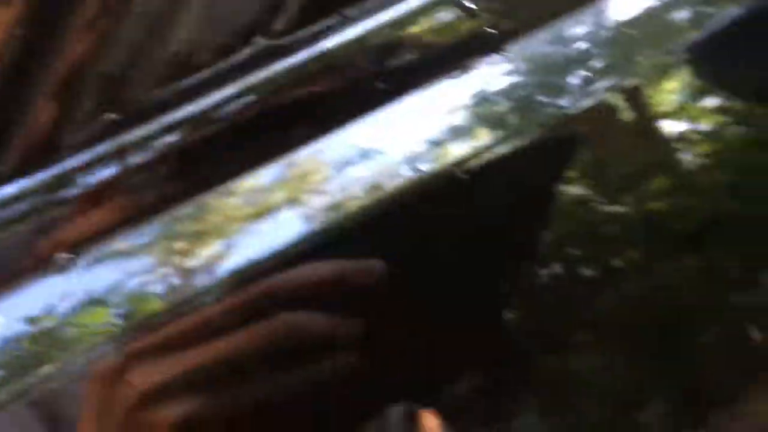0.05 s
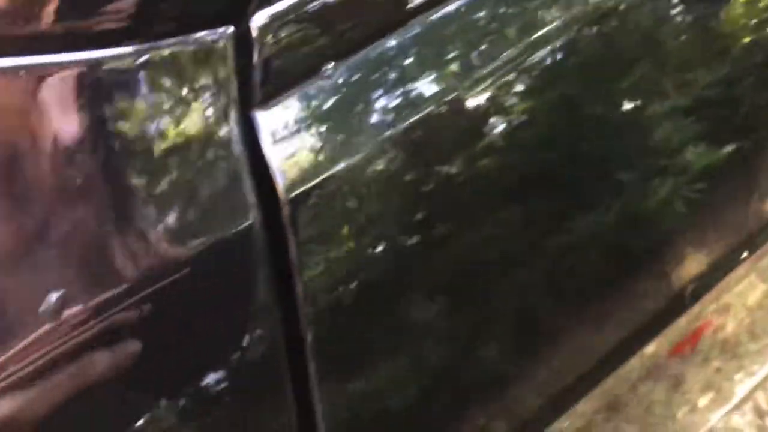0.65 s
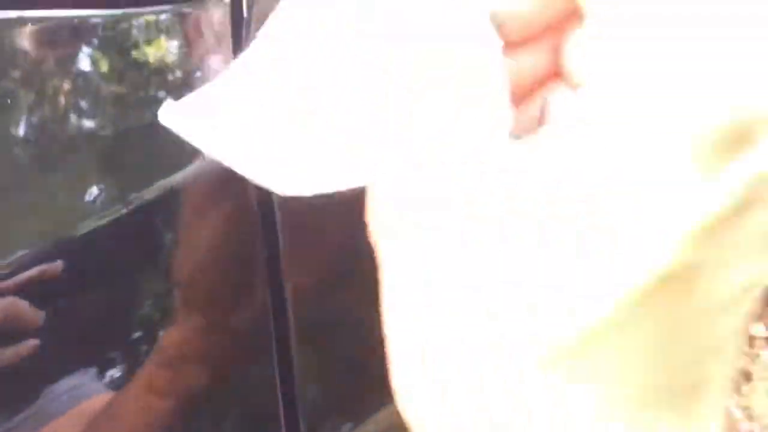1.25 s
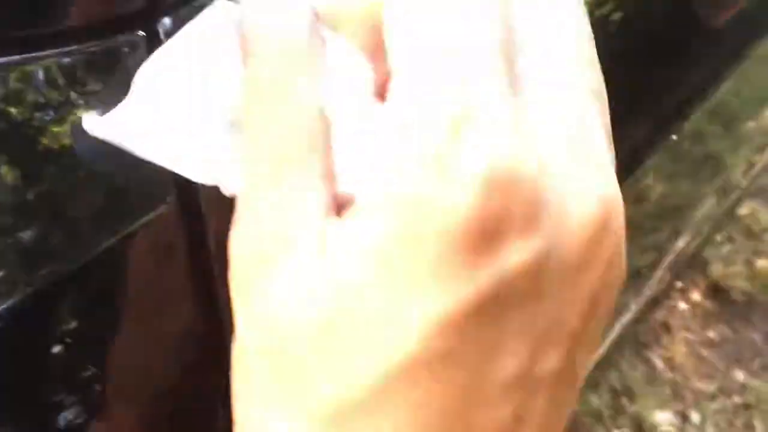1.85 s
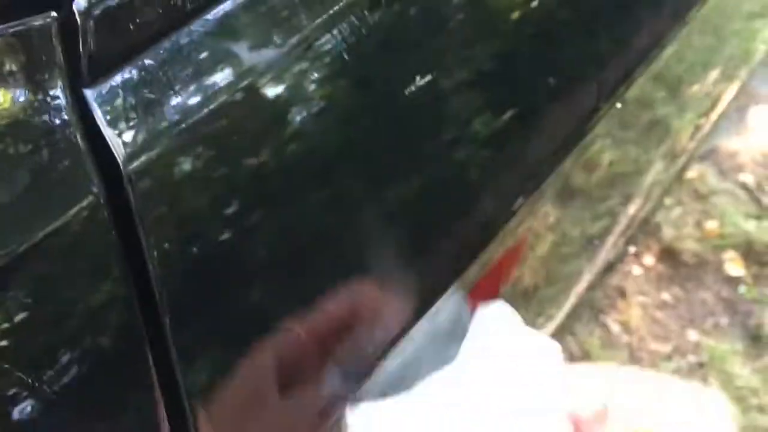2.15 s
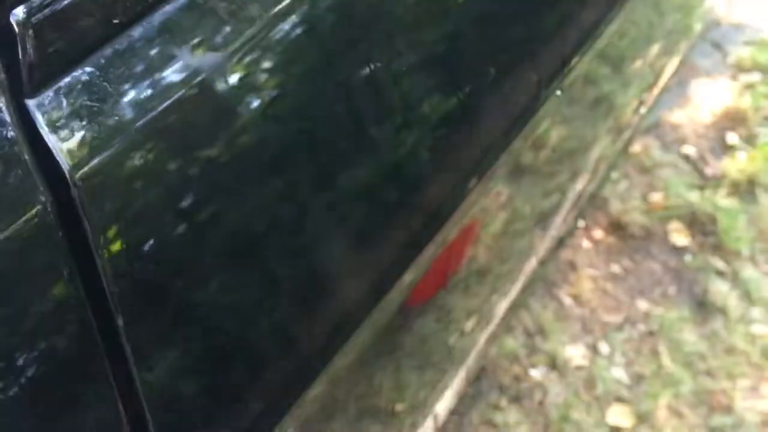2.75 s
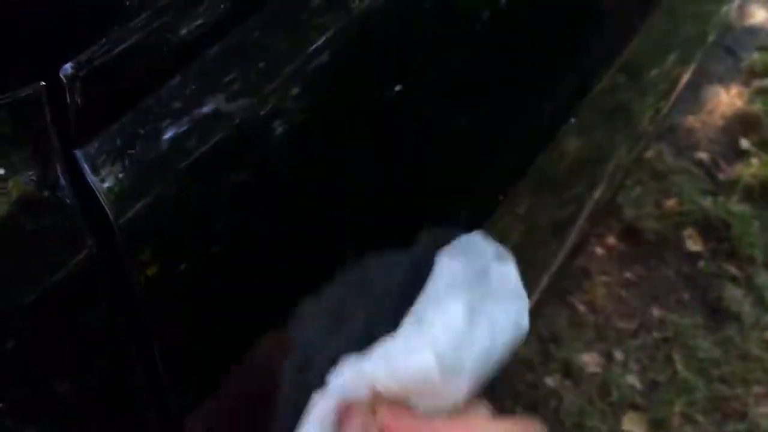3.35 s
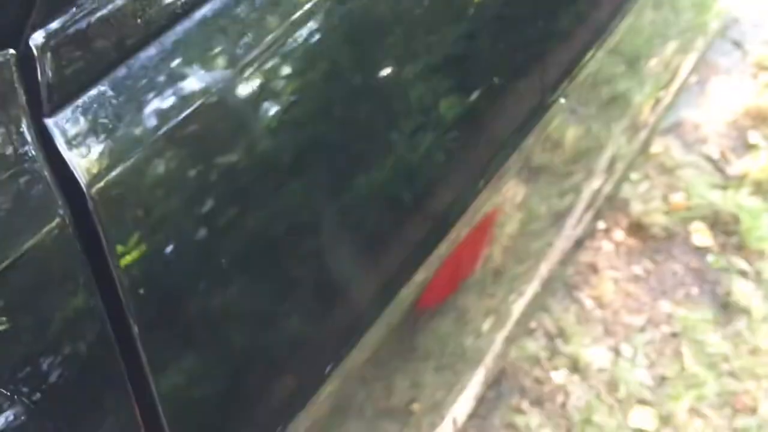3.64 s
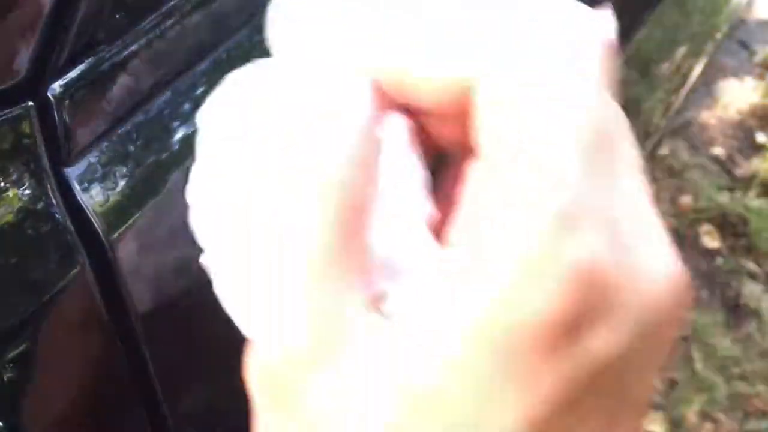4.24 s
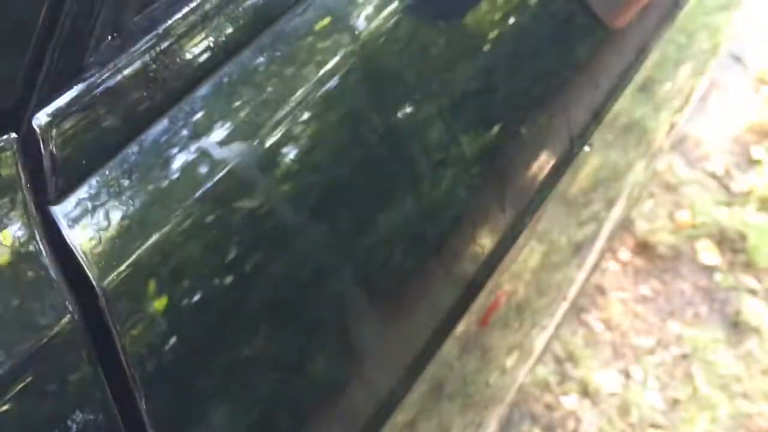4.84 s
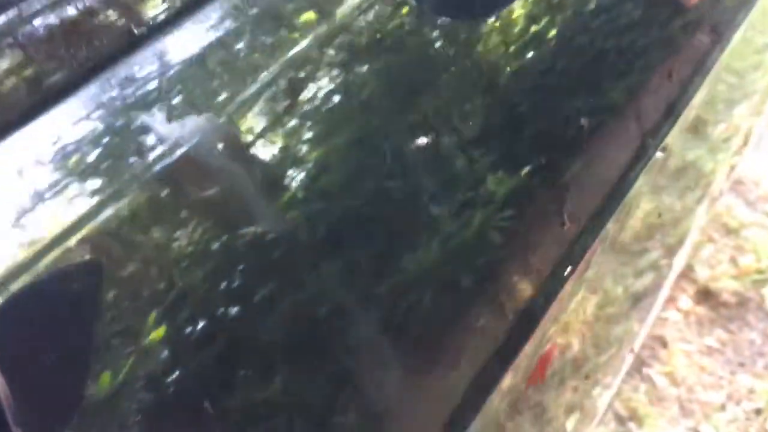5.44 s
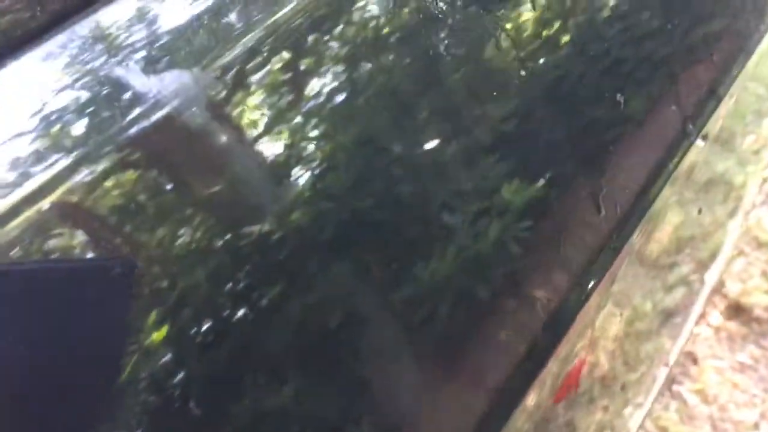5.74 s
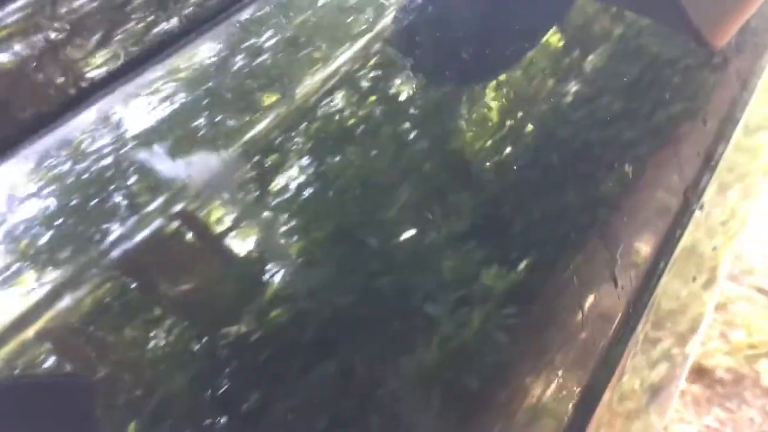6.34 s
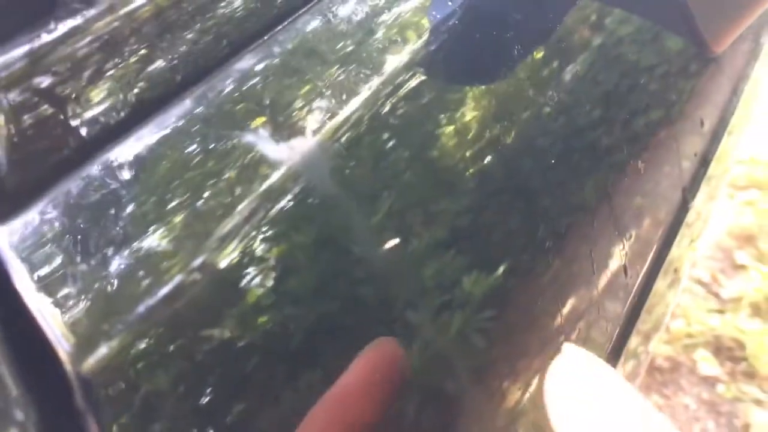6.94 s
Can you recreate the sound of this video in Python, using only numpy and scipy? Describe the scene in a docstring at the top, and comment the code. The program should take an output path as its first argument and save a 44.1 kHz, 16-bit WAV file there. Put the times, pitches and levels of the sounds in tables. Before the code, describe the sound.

A damp tissue wipes a car door in wet, crackling swishes, with a few soft knocks and a squeak over a low outdoor rumble.

```python
"""Wiping a car door

A damp wad is wiped over a car door outdoors, close to a mono microphone. The wet film
hisses, crackles and snaps. Now and then the wad grips the paint and squeaks, or lands
with a soft knock that drums the door's metal skin. A low rumble lies underneath."""
import sys
import numpy as np
from scipy import signal
from scipy.fft import rfft, irfft, next_fast_len
from scipy.io import wavfile
from scipy.ndimage import uniform_filter1d

SR = 44100
rng = np.random.default_rng(int(sys.argv[2]) if len(sys.argv) > 2 else 0)


def log_audio(samples):
    """Write samples as a 16-bit WAV file to the path given in sys.argv[1]."""
    # one column per channel
    frames = np.atleast_2d(samples).T
    # limit to full scale, then quantise
    limited = np.clip(frames, -1, 1)
    pcm = np.round(limited * 32767).astype(np.int16)
    wavfile.write(sys.argv[1], SR, pcm)


N = 308259
T = np.arange(N) / SR


def wiping():
    """The sliding wad makes gritty friction, fizz from the wet film and a duller drag."""
    # light contact between strokes: time_s, level_db, fizz_offset_db
    contact = [(0, -60, -10), (.4, -60.5, -7.5), (.8, -62, -13), (1.1, -56.5, -5), (1.7, -59.5, 0.5),
               (2.15, -57, -8), (2.5, -54, -10), (3.0, -51, -2), (3.7, -64, -26), (4.02, -66, -11),
               (4.4, -53.5, -6.5), (4.85, -60.5, -13), (5.15, -59.5, -13), (5.42, -70, -3.5),
               (5.85, -68.5, -11), (6.99, -73, -7)]
    # strokes over the paint: fastest_at_s, rise_s, fade_s, level_db, fizz_offset_db
    strokes = [(.135, 0.06, 0.074, -57, -22), (.29, 0.046, 0.079, -55.5, -11),
               (.64, 0.034, 0.031, -57.5, -13), (.87, .012, .03, -55, -12), (.97, 0.072, 0.057, -48.5, -17),
               (1.19, 0.024, 0.021, -53.5, -7), (1.3, 0.026, 0.035, -51.5, -14),
               (1.415, 0.058, 0.045, -46.5, -4.5), (1.51, 0.033, 0.044, -64.5, 12.5),
               (1.575, .028, 0.038, -48, -13), (1.945, 0.13, 0.066, -48.5, -6.5),
               (2.06, 0.032, 0.039, -52, 0.5), (2.22, 0.04, 0.029, -51.5, -0.5),
               (2.36, 0.12, 0.057, -56, 2.5), (2.45, 0.022, 0.051, -48, -7), (2.512, 0.015, .06, -46.5, -7),
               (2.62, 0.11, 0.071, -59, 10.5), (2.705, 0.012, 0.062, -48, -9),
               (2.84, 0.069, 0.066, -47.5, -4), (3.055, 0.043, 0.18, -41.5, -9),
               (3.205, 0.028, .1, -36.5, -13), (3.35, 0.11, 0.21, -39.5, -9.5),
               (3.58, 0.063, 0.069, -50, -29), (3.77, 0.031, 0.11, -58, -11), (4.12, 0.047, .04, -62, -1.5),
               (4.21, 0.05, 0.038, -50, -6), (4.335, 0.064, .035, -55.5, 1), (4.43, 0.028, .04, -54.5, 2),
               (4.52, 0.086, 0.14, -42, -10), (4.62, 0.089, 0.12, -43, -23), (5.01, 0.12, .16, -55, -9.5),
               (5.3, 0.22, 0.052, -64.5, 1), (5.59, 0.24, 0.06, -63.5, -14), (5.75, .025, 0.16, -65.5, -11),
               (6.05, .015, .025, -62.5, -5), (6.15, 0.041, 0.045, -69.5, -14),
               (6.36, 0.11, 0.098, -67, -8), (6.72, 0.096, 0.046, -68, -3)]
    # the tone of the friction, the fizz and the drag: pitch_hz, gain_db
    friction_tone = [(500, -40), (1200, -14), (1750, 0), (2700, -3.5), (3600, -2.5), (4600, -4.5),
                     (6200, -4.5), (7400, -13.5), (9000, -26), (14000, -48)]
    fizz_tone = [(4000, -5.5), (7000, -1), (8800, 0), (11700, -4.5), (13300, -7), (16000, -8)]
    drag_tone = [(200, -5.5), (400, -5.5), (600, -6), (1050, 0), (1400, -2), (2200, -18.5), (5000, -36)]
    touch_db, wet_db = curves(contact)
    rubbing = undb(touch_db) ** 2 + swells(row[:4] for row in strokes)
    wet_strokes = swells((s, rise, fade, db + wet) for s, rise, fade, db, wet in strokes)
    wetness = undb(touch_db + wet_db) ** 2 + wet_strokes
    level_db = 10 * np.log10(rubbing)
    # a light touch catches unevenly, a firm stroke slides smoothly
    uneven_db = np.interp(level_db, [-53, -42], [2.4, 1.1])
    grip = undb(0.65 * uneven_db * wander(45))
    friction = colour(crackle(per_s=3500, spread_db=3.5, share=0.41), friction_tone) * np.sqrt(rubbing)
    foam = colour(crackle(per_s=1100, spread_db=3.5, share=0.25), fizz_tone)
    lone_bubbles = colour(crackle(per_s=45, spread_db=0.5, share=1), fizz_tone)
    fizz = (foam + undb(-12.5) * lone_bubbles) * np.sqrt(wetness)
    # the drag grows more slowly than the friction, and dies away as the wad lifts off
    light_touch_db = -56.5
    drag_db = -61.5 + 0.26 * (level_db - light_touch_db)
    touching = np.sqrt(rubbing / (rubbing + undb(-59) ** 2))
    drag = colour(crackle(per_s=600, spread_db=2, share=0.45), drag_tone) * undb(drag_db) * touching
    rub = grip * (undb(-1.84) * friction + undb(0.3) * fizz + drag)
    return folds(rub, uneven_db, per_s=40)


def folds(x, depth_db, per_s):
    """Folds of the wad open and close small pockets, so narrow bands of pitch swell and sink."""
    size = next_fast_len(N)
    spectrum = rfft(x, size)
    pitch = np.log(np.fft.rfftfreq(size, 1 / SR) + 1500)
    centres = np.linspace(pitch[0], pitch[-1], 24)
    shares = (np.maximum(1 - np.abs(pitch - c) / (centres[1] - centres[0]), 0) for c in centres)
    bands = (irfft(spectrum * share, size)[:N] * undb(depth_db * wander(per_s)) for share in shares)
    return sum(bands) * undb(-depth_db ** 2 * np.log(10) / 20)  # keep about the same loudness


def brushes():
    """Wet crackle swells briefly as a fold is dragged, foam sizzles or the wad is squashed."""
    # quick wet brushes: peak_s, rise_s, fade_s, level_db, pitch_hz, width_hz
    quick_brushes = [(.085, .0086, .02, -50.5, 3500, 5000), (.289, .0093, 0.024, -50.5, 4670, 1990),
                     (.974, .05, 0.014, -50.5, 2750, 4000), (1.571, .012, .018, -37, 3850, 9900),
                     (1.578, .0098, 0.089, -53, 500, 1000), (1.715, .012, 0.019, -52.5, 1950, 3000),
                     (1.855, .019, .028, -49.5, 7450, 9000), (1.917, 0.015, 0.013, -43.5, 1600, 2500),
                     (2.512, 0.0099, 0.015, -47, 1000, 800), (1.962, .012, 0.023, -49.5, 840, 500),
                     (2.078, .013, 0.013, -46.5, 5000, 10000), (2.09, .015, 0.0072, -47, 445, 500),
                     (2.6, .06, .04, -48.5, 6160, 1500), (2.652, .012, 0.01, -43, 4540, 9000),
                     (3.014, .013, 0.057, -45, 5500, 1600), (3.24, .05, 0.18, -45, 3820, 900),
                     (3.322, .021, 0.021, -49, 494, 250), (3.95, .013, 0.0099, -61.5, 2730, 690),
                     (5.225, 0.041, 0.049, -58, 3430, 1380), (5.305, 0.056, 0.055, -59, 2410, 900),
                     (5.571, .093, .06, -69, 1790, 450), (6.05, .0091, 0.039, -65, 1780, 500),
                     (6.71, .043, 0.064, -61.5, 4600, 2200)]
    # thin, very high sizzles of foam: peak_s, length_s, level_db
    sizzles = [(0.342, 0.13, -60.5), (1.188, 0.0053, -51), (3.78, 0.12, -63.5), (4.928, .08, -72),
               (5.227, 0.08, -64), (5.98, .025, -70)]
    # the wad pressed flat: peak_s, rise_s, fade_s, level_db, hollow_offset_db
    squashes = [(3.052, .005, 0.074, -34.5, -3.5), (4.66, .025, 0.078, -43.5, -2)]
    sizzle, spit, hollow = (14300, 3600), (1870, 1140), (830, 420)  # each: pitch_hz, width_hz
    bursts = list(quick_brushes)
    bursts += [(s, length / 2, length / 2, db, *sizzle) for s, length, db in sizzles]
    # a squash spits out water and rings the hollow under the palm
    for s, rise, fade, db, hollow_db in squashes:
        bursts += [(s, rise, fade, db, *spit), (s, rise, fade, db + hollow_db, *hollow)]
    out = np.zeros(N)
    grit = crackle(per_s=1300, spread_db=4.0, share=0.52)
    for s, rise, fade, db, hz, width in bursts:
        t = np.arange(-2 * rise, 6 * fade, 1 / SR)
        swell = np.exp(np.where(t < 0, -2 * (t / rise) ** 2, -t / fade))
        grains = np.roll(grit, rng.integers(N))[:len(t)]
        squelch = unit(steep_band(grains, hz, 1.32 * width))  # widened, as filtering twice narrows it
        add(out, s - 2 * rise, undb(db) * swell * squelch)
    return out


def snaps(tick_s=0.00064, spatter_s=0.0046, spatter_db=-16):
    """A film of water parts with a tick and a tiny spatter."""
    # small wet snaps: start_s, level_db, pitch_hz, width_hz
    wet_snaps = [(.083, -49, 1300, 900), (0.322, -50, 1180, 800), (0.474, -51, 5400, 2500),
                 (0.858, -50, 3950, 7960), (0.9873, -36.5, 3400, 4470), (1.676, -44, 3060, 4500),
                 (1.727, -45, 2670, 2200), (1.803, -48.5, 2200, 3000), (1.920, -40, 2480, 5000),
                 (2.030, -47, 900, 2000), (2.653, -42, 2500, 5000), (2.963, -45, 2800, 2500),
                 (5.347, -53, 2350, 1500), (5.565, -56, 1850, 700), (5.910, -56, 4570, 2400),
                 (5.967, -59, 3800, 3000), (6.045, -62, 4500, 6000), (6.547, -63, 3200, 1500),
                 (6.7533, -54.5, 1070, 900), (6.831, -58, 2320, 2000)]
    out, t = np.zeros(N), np.arange(SR // 20) / SR
    fade = np.exp(-t / tick_s) + undb(spatter_db) * np.exp(-t / spatter_s)
    for s, db, hz, width in wet_snaps:
        tick = steep_band(rng.choice([-1, 1], len(t)) * fade, hz, width)
        add(out, s, undb(db) * tick / tick[:SR // 500].std())  # the first 2 ms set the level
    return out


def squeaks():
    """The wad grips the paint: one rising squeak, and several short chirps."""
    # the rising squeak: time_s, pitch_hz, level_db, roughness (0 is smooth)
    squeak = [(4.446, 934, -53, 0.7), (4.452, 937, -34, 1.2), (4.462, 998, -34.5, 0.6),
              (4.469, 1068, -25.5, 0.4), (4.479, 1386, -28.5, 0.15), (4.487, 1465, -25.5, 0),
              (4.499, 1468, -23, 0.05), (4.508, 1657, -26.5, 0.2), (4.518, 1760, -33, 0.1),
              (4.529, 1850, -47, .2)]
    # brief grips: start_s, length_s, start_hz, end_hz, level_db, roughness
    grips = [(0.071, 0.036, 1155, 1350, -51, 0.9), (1.948, 0.018, 1420, 1590, -39.5, 0.53),
             (1.967, 0.0058, 1510, 2120, -37.5, 0.9), (2.505, 0.004, 1860, 1980, -30.5, 0.37),
             (2.515, 0.024, 1794, 2030, -45, .8), (3.046, 0.0069, 1650, 2220, -26.5, 0.56),
             (3.054, 0.0092, 2680, 1920, -32, 0.4), (3.422, 0.018, 417, 380, -41, 0.65),
             (3.431, 0.017, 200, 234, -37, 0.6), (3.446, 0.016, 288, 397, -33.5, 0.56),
             (4.582, 0.0056, 860, 980, -33, 0)]
    hz, db, rough = curves(squeak)
    tone = stick_slip(hz, rough, jitter=.15, judder=.7, second_db=-15, third_db=-16)
    out = undb(db) * span(squeak, fade_s=.003) * tone
    for s, length, start_hz, end_hz, db, rough in grips:
        n = int(length * SR)
        glide_hz = np.linspace(start_hz, end_hz, n)
        chirp = stick_slip(glide_hz, rough, jitter=0.33, judder=0.63, second_db=-23, third_db=-34)
        add(out, s, undb(db) * signal.windows.tukey(n, .6) * chirp)
    return out


def stick_slip(hz, rough, jitter, judder, second_db, third_db):
    """Fast sticking and slipping makes a tone; a rough grip shakes its pitch and loudness."""
    wobble = unit(band(rng.standard_normal(len(hz) + SR // 10), 390, 910))[-len(hz):]
    phase = 2 * np.pi * np.cumsum(hz * (1 + jitter * rough * wobble)) / SR
    shake = np.sin(2 * np.pi * np.cumsum(215 * (1 + 0.23 * wobble)) / SR)
    # a rough grip lets go more abruptly, so it is richer in overtones
    second = undb(second_db + 8.6 * rough) * np.sin(2 * phase)
    # the soft wad swallows this overtone above about 4 kHz
    third = undb(third_db) / (1 + (3 * hz / 4100) ** 10) * np.sin(3 * phase)
    return (np.sin(phase) + second + third) * (1 + judder * rough * shake)


def door():
    """Soft blows ring the door skin, muffled by the hand; rubbing keeps it drumming."""
    # the hand lands: time_s, level_db, contact_s
    knocks = [(1.571, -46, 0.0018), (2.723, -34, 0.0055), (2.82, -34, 0.0051), (3.0529, -26.5, 0.002),
              (3.0601, -21, 0.002), (3.102, -34, 0.0033), (4.638, -38.5, 0.0016), (4.656, -36, 0.0038)]
    # the notes the skin rings at: pitch_hz, level_db, ring_s (time to fall by 60 dB)
    notes = [(75.6, -5.5, 0.21), (113, -3, 0.12), (138, -3, 0.18), (161.7, -14.5, 0.45), (265, -18.5, 0.29),
             (302, -12, 0.17), (497, -15, 0.09), (650, -15, .08), (800, -13, .08)]
    # the hand leans on spots that each ring differently: peak_s, rise_s, fade_s, level_db, pitch_hz
    pushes = [(.65, 0.027, 0.036, -56.5, 232), (1.39, 0.052, 0.027, -58, 200),
              (1.58, 0.024, 0.03, -49.5, 190), (1.74, .04, .03, -60, 172), (1.89, 0.037, 0.038, -56, 260),
              (2.09, 0.036, 0.012, -51.5, 211), (2.315, 0.034, 0.019, -51.5, 240),
              (2.52, 0.19, .12, -63, 159), (2.73, 0.059, .03, -55, 146), (2.83, .035, 0.081, -55.5, 139),
              (2.96, 0.016, 0.02, -47.5, 162), (3.07, .022, 0.05, -37.5, 145),
              (3.13, 0.041, 0.056, -39, 260), (3.21, .04, 0.12, -47, 165), (3.445, 0.026, 0.019, -40, 476),
              (4.255, .02, 0.021, -50.5, 148), (4.463, .012, 0.011, -42, 230),
              (4.66, 0.046, 0.074, -43, 151), (4.82, 0.098, .07, -50.5, 293),
              (4.932, 0.037, 0.055, -56, 173), (5.74, .03, .04, -55.5, 222)]
    # the tone of the drumming: pitch_hz, gain_db
    drum_tone = [(25, -45), (60, -2), (110, -9.5), (155, -2), (210, -7), (290, -5.5), (400, -11.5),
                 (600, -36), (1500, -53.5)]
    t, blows = np.arange(SR // 2) / SR, np.zeros(N)
    ring = sum(undb(db - 60 * t / ring_s) * np.cos(2 * np.pi * hz * t) for hz, db, ring_s in notes)
    for s, db, contact in knocks:
        blow = np.hanning(int(contact * SR))
        add(blows, s - contact / 2, undb(db) * blow / blow.sum())
    # pressing hard also muffles the skin, so the drumming levels off
    press = np.minimum(np.sqrt(swells(row[:4] for row in pushes)), undb(-38))
    drum = colour(crackle(per_s=180, spread_db=2.0, share=0.55), drum_tone) * press * undb(-5.5)
    slips = crackle(per_s=290, spread_db=2.5, share=0.42)
    for *movement, hz in pushes:
        spot = unit(steep_band(slips, hz, width_hz=106))
        drum += undb(-4.5) * np.sqrt(swells([movement])) * spot
    return undb(-2.5) * signal.fftconvolve(blows, ring)[:N] + drum


def outdoors():
    """A low rumble wavers, a puff of air meets the microphone and the distance hisses faintly."""
    # the loudness of the rumble: time_s, level_db
    rumble_levels = [(0, -53), (.7, -56.5), (1.1, -56), (1.8, -58), (2.5, -53), (3.5, -55), (5.1, -54.5),
                     (5.4, -58), (6.05, -58), (6.99, -55.5)]
    # the tone of the rumble and of the distant hiss: pitch_hz, gain_db
    rumble_tone = [(15, -33), (26, -31), (38, -6), (56, 1), (80, 2), (115, -8), (200, -13.5), (340, -20),
                   (500, -33.5), (1000, -43.5)]
    hiss_tone = [(100, -11.5), (300, 7.5), (600, 2), (1400, -6), (5000, -9), (8000, -58), (16000, -26)]
    # the soft puff of air: peak_s, rise_s, fade_s, level_db
    puffs = [(.4, 0.19, 0.27, -52)]
    rumble_db, = curves(rumble_levels)
    rumble = colour(rng.standard_normal(N), rumble_tone) * undb(rumble_db + .7 * wander(6.8))
    puff = unit(steep_band(rng.standard_normal(N), hz=45, width_hz=22)) * np.sqrt(swells(puffs))
    hiss = undb(-69.5) * colour(rng.standard_normal(N), hiss_tone)
    return rumble + puff + hiss


def crackle(per_s, spread_db, share):
    """Tiny slips and bursting films click over a smooth hiss; share is the clicks' part of the power."""
    sizes = undb(spread_db * np.minimum(rng.exponential(size=N), 4))
    clicks = (rng.random(N) < per_s / SR) * sizes * rng.choice([-1, 1], N)
    return np.sqrt(share) * unit(clicks) + np.sqrt(1 - share) * rng.standard_normal(N)


def swells(movements):
    """The total power of movements that each gather speed and come to rest in a bell shape."""
    power = np.zeros(N)
    for s, rise, fade, db in movements:
        t = np.arange(-min(3 * rise, s), 3 * fade, 1 / SR)
        bell = np.exp(-(t / np.where(t < 0, rise, fade)) ** 2)
        add(power, s + t[0], (undb(db) * bell) ** 2)
    return power


def wander(per_s):
    """A curve that slides to a new random value per_s times a second; its typical size is 1."""
    hold = int(SR / per_s)
    steps = np.repeat(rng.standard_normal(N // hold + 2), hold)
    return unit(uniform_filter1d(steps, hold)[hold // 2:hold // 2 + N])


def colour(x, tone):
    """Shape x with a tone curve of (pitch_hz, gain_db) points, at an average level of 1."""
    hz, db = np.transpose(tone)
    size = next_fast_len(N)
    pitches = np.maximum(np.fft.rfftfreq(size, 1 / SR), 1)
    gain = undb(np.interp(np.log(pitches), np.log(hz), db))
    return unit(irfft(rfft(x, size) * gain, size)[:N])


def band(x, hz, width_hz):
    """A resonance that keeps the pitches near hz."""
    return signal.lfilter(*signal.iirpeak(hz, hz / width_hz, fs=SR), x)


def steep_band(x, hz, width_hz):
    """The same resonance twice, for a narrower band with steeper sides."""
    return band(band(x, hz, width_hz), hz, width_hz)


def curves(table):
    """One curve for each column after time_s, joining the rows with straight lines."""
    times, *columns = np.transpose(table)
    return [np.interp(T, times, column) for column in columns]


def span(table, fade_s):
    """1 from a table's first time to its last, fading to 0 outside."""
    return np.clip(np.minimum(T - table[0][0], table[-1][0] - T) / fade_s + 1, 0, 1)


def add(out, start_s, sound):
    """Mix a sound in at start_s."""
    i = max(int(start_s * SR), 0)
    out[i:i + len(sound)] += sound[:N - i]


def undb(db):
    """Turn decibels into a multiplier."""
    return 10 ** (np.asarray(db) / 20)


def unit(x):
    """Scale to an average (rms) level of 1."""
    return x / np.sqrt(np.mean(x ** 2) + 1e-20)


def scene():
    """Everything reaches one microphone, the same in both channels."""
    return np.tile(wiping() + brushes() + snaps() + squeaks() + door() + outdoors(), (2, 1))


def record(dry):
    """The microphone's opening weakens two treble bands; the highest treble is cut steeply."""
    # dips in the microphone's treble: pitch_hz, width_hz, depth (0 to 1)
    dips = [(4900, 500, 0.4), (10450, 910, 0.54)]
    for hz, width, depth in dips:
        dry = dry - depth * band(dry, hz, width)
    top_hz = 15800
    return signal.sosfilt(signal.ellip(12, .1, 80, top_hz, fs=SR, output="sos"), dry)


dry = scene()
out = record(dry)
log_audio(out)
```